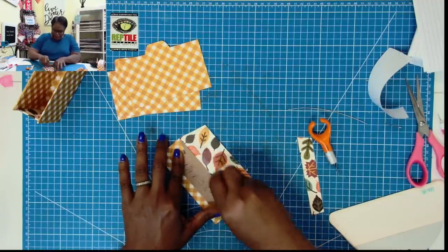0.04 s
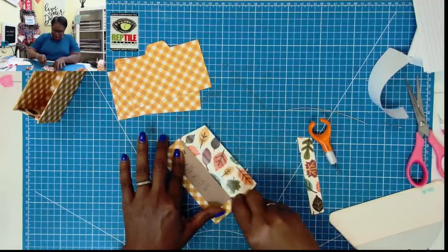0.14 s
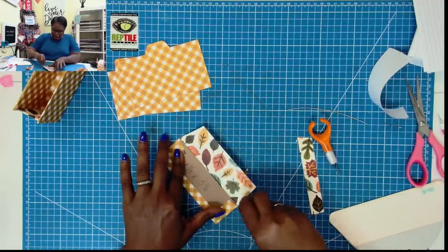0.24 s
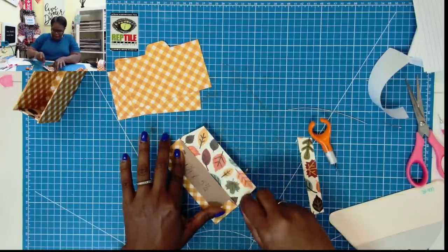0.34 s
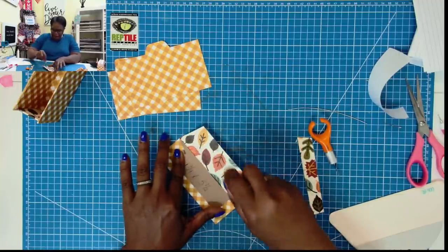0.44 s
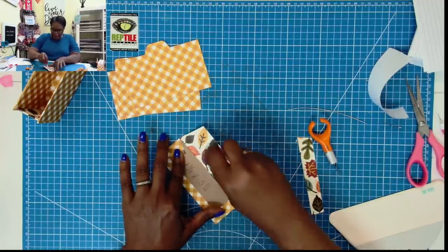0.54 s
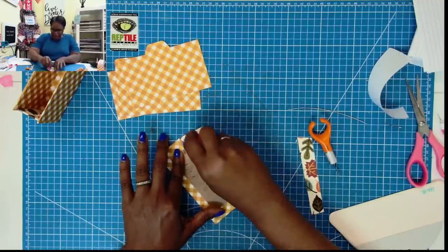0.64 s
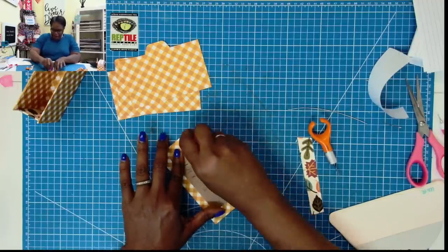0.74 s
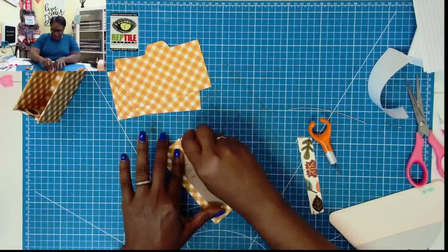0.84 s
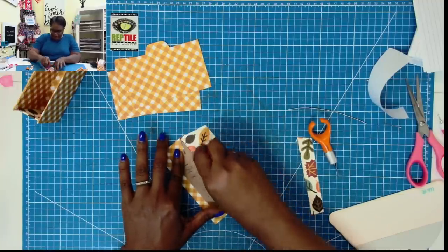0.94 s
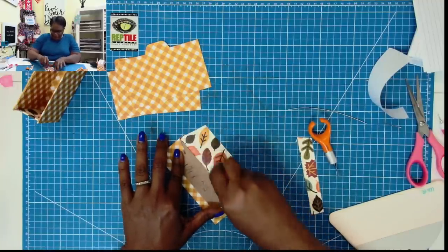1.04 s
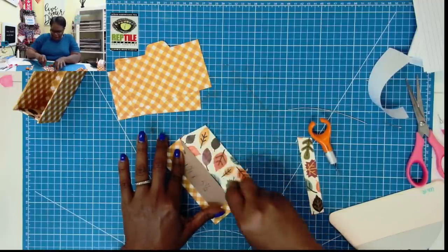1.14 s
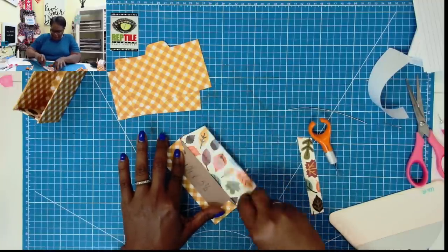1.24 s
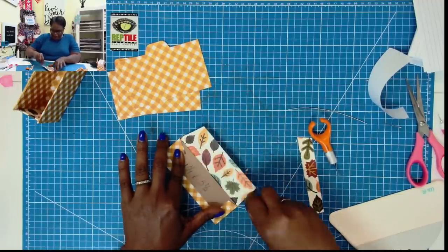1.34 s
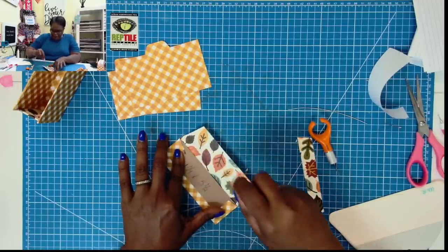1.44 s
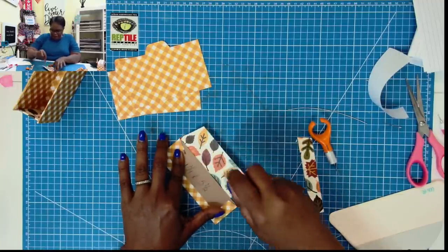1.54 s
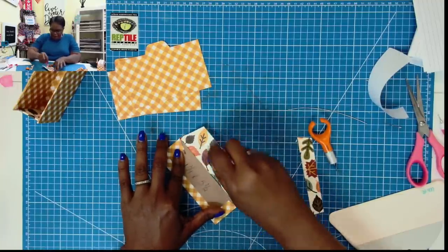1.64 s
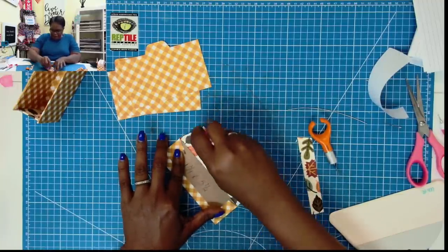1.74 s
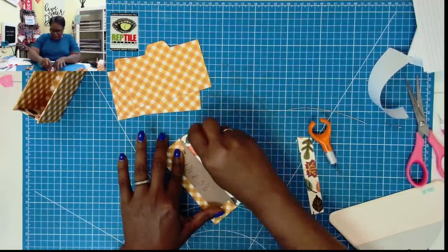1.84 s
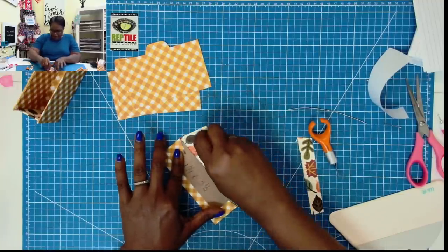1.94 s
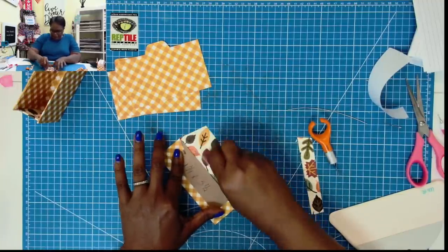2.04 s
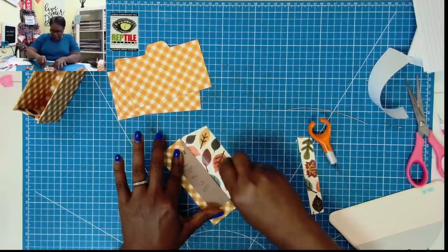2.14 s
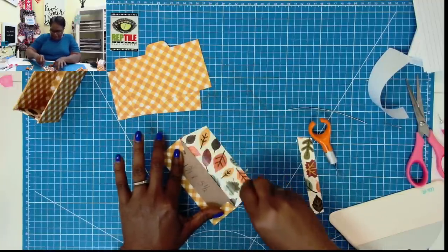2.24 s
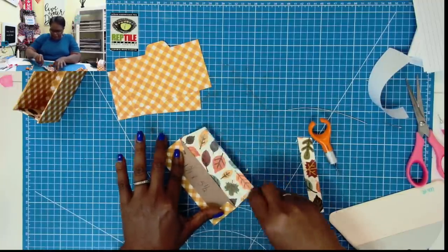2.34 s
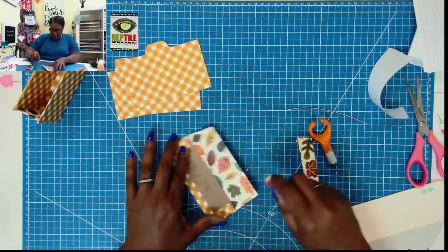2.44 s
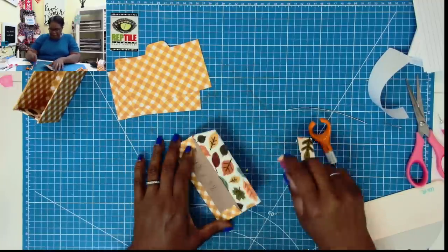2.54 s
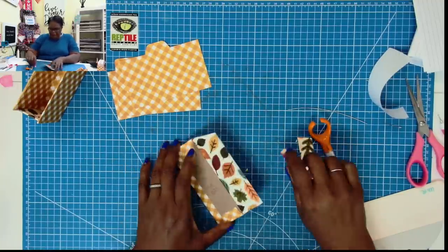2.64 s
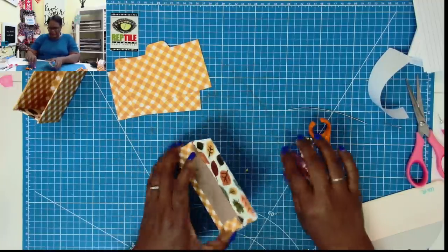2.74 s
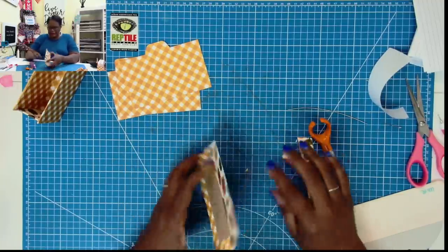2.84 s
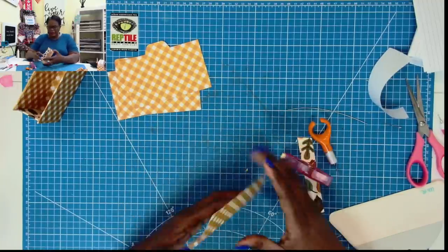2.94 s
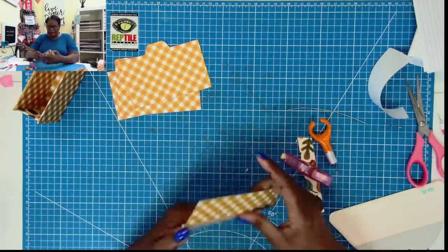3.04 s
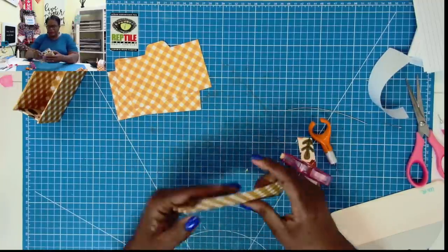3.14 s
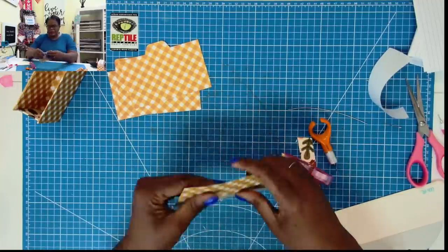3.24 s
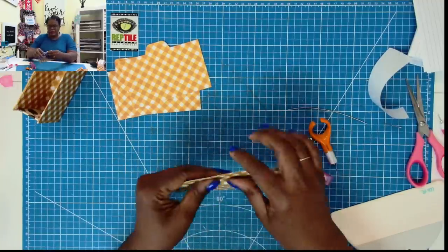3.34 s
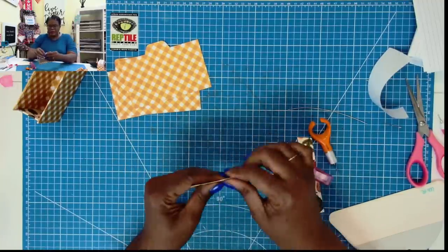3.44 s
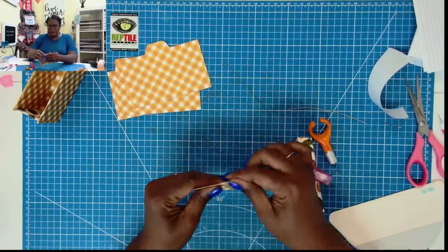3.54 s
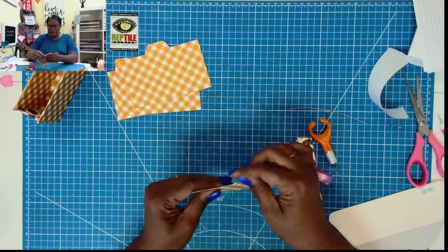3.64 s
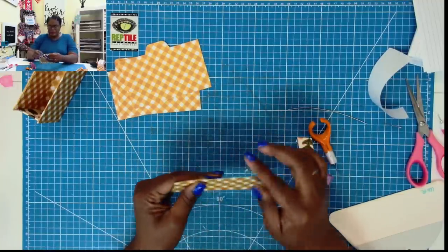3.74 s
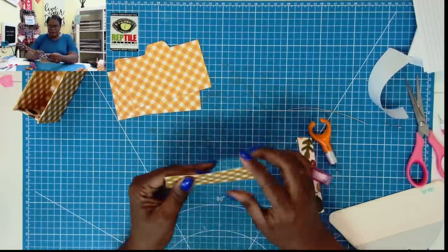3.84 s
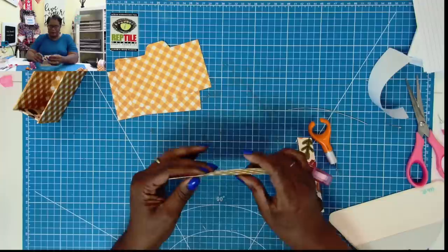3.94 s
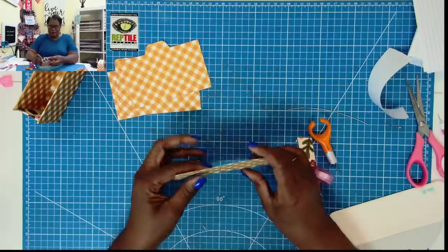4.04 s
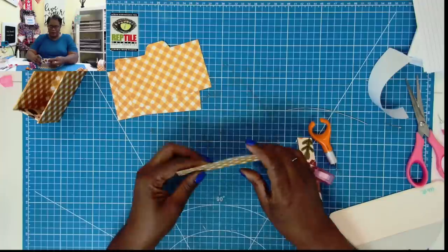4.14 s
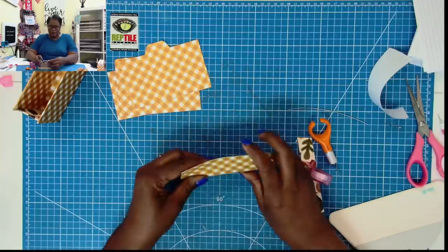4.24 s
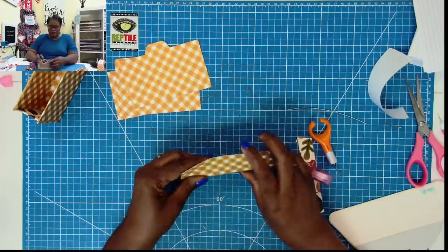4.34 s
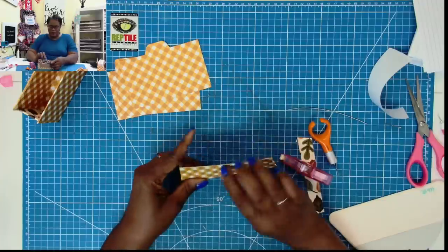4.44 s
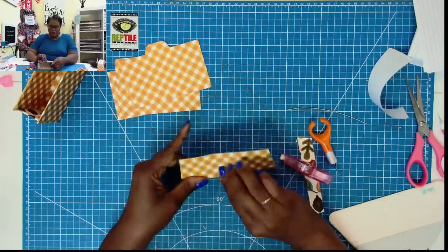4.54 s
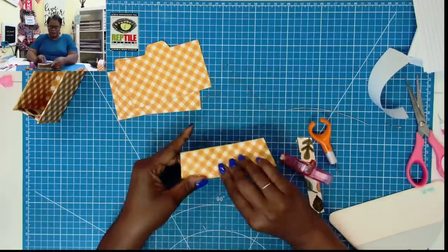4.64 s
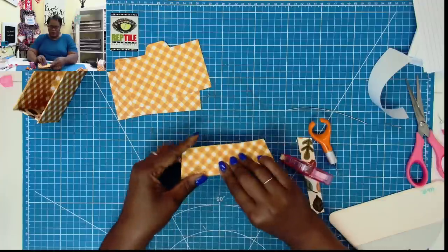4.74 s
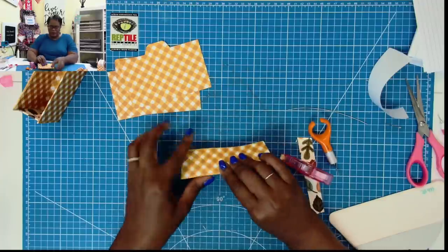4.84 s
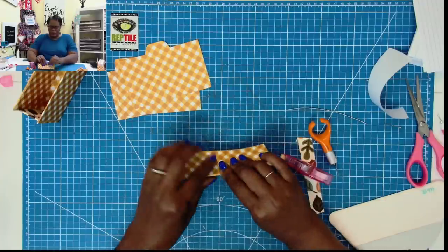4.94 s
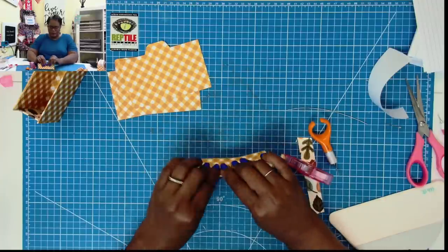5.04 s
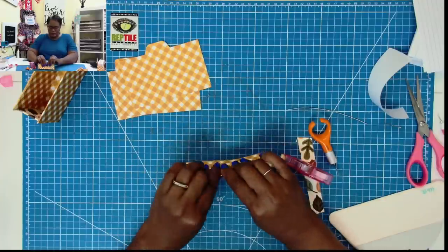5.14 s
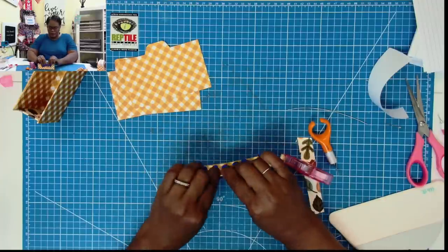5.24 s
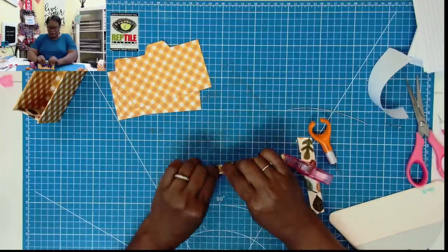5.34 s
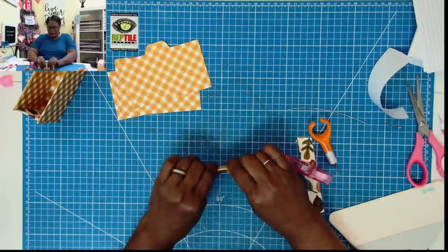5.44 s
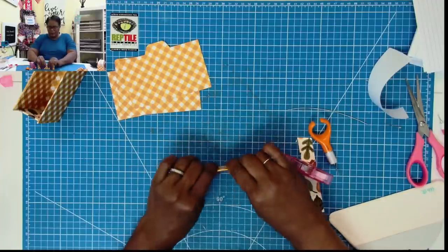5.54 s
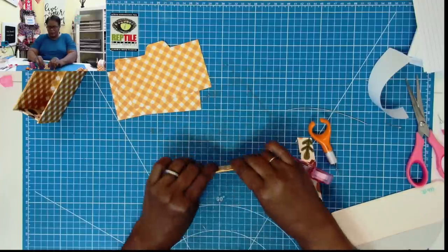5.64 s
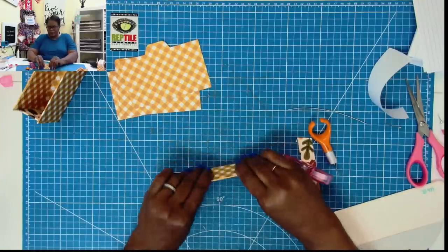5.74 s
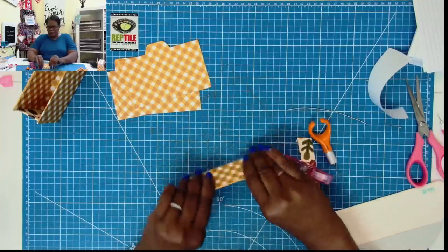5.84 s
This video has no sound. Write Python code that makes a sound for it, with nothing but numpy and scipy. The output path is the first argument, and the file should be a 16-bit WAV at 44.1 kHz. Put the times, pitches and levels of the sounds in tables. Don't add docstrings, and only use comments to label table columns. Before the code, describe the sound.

Close up in a small furnished room, a plastic tape runner makes three dry, ratcheting strokes over card, with little squeaks and sharp snaps at the edge. The tool drops with a ringing knock. Fingers then turn and fold stiff card with ticks, crinkles and pops, ending in soft kneading thumps. Low ventilation rumble, nearly mono microphone.

```python
import sys
import numpy as np
from scipy import signal
from scipy.fft import rfft, irfft, next_fast_len
from scipy.io import wavfile
from scipy.ndimage import uniform_filter1d, map_coordinates

SR = 44100
rng = np.random.default_rng(int(sys.argv[2]) if len(sys.argv) > 2 else 0)


def pcm_store(signal):
    levels = np.round(np.clip(np.atleast_2d(signal), -1, 1) * 32767)
    wavfile.write(sys.argv[1], SR, levels.astype(np.int16).T)


def natural_amplitude(level_db):
    exponent = np.asarray(level_db, float) / 20
    return 10 ** exponent


N = 259293

# time_s, drag_db, bite_db
STROKE_LEVELS = [
    [(0.0, -38, 4), (0.0735, -37, 0.5), (0.076, -22, -3), (0.09, -56, 4), (0.13, -69, 16)],
    [(0.67, -90, 16), (0.695, -42, -2), (0.75, -37, 0.5), (0.818, -38, -2), (0.834, -41.5, -4),
     (0.946, -31, -1), (1.034, -39.5, -28), (1.102, -36.5, -16), (1.16, -54, -1)],
    [(1.73, -86, 4), (1.75, -40.5, -3), (1.816, -36, 0.5), (1.86, -35.5, -1.5), (1.944, -41.5, -10),
     (1.994, -34, 2.5), (2.147, -41, -6.5), (2.151, -34.5, 7.5), (2.22, -64, -9)],
]
# time_s, teeth_hz, depth_db
RATCHET_TEETH = [
    [(0.0, 200, 2), (0.075, 200, 1)],
    [(0.6936, 98, 11), (0.72, 148, 10), (0.755, 235, 5), (0.79, 250, 2.5), (0.86, 370, 1.5),
     (0.93, 310, 1.5), (0.97, 290, 5), (1.01, 230, 2.5), (1.1, 200, .6)],
    [(1.7636, 140, 6), (1.795, 215, 5), (1.86, 242, 7), (1.89, 230, 2.5), (1.95, 280, .6), (2.02, 290, 3.5),
     (2.05, 275, 6), (2.09, 290, 2.5), (2.15, 250, 1.2)],
]
# pitch_hz, width_hz, level_db
CASE_MODES = [(1420, 320, -4.5), (2500, 640, -2), (3300, 860, -2.5), (3950, 700, -2.5)]
# pitch_hz, level_db_per_hz
FIBRE_HISS = [(240, -39), (400, -16), (625, -8.5), (877, -11.5), (1460, -6.5), (2110, -15.5), (2460, -2),
              (2780, -7), (3900, -2), (5900, -8.5), (8540, -1), (10800, -11.5), (15800, -10)]
# pitch_hz, level_db_per_hz
AIR_SPECTRUM = [(8.8, -37), (15, 0.5), (36, -4), (77, -22.5), (91, -33), (126, -13.5), (150, -23),
                (310, -25), (348, -18), (380, -24), (680, -30.5), (1050, -28.5), (1290, -34), (1890, -34),
                (15800, -41)]
# pitch_hz, width_hz, level_db
VENT_HUM = [(24.3, 8.1, -54), (70.5, 3.4, -57.5), (117.8, 7.5, -61.5)]
# pitch_hz, t60_s
ROOM_DECAY = [(150, 0.41), (1000, 0.2), (4000, 0.18), (12000, 0.13)]
# start_s, strength_db, sharpness_db (crack over ring), ring_hz
TIP_CATCHES = [(0.0064, -38, 21.5, 2440), (0.0825, -37, 1, 2700), (0.5355, -50.5, 4.5, 1660),
               (0.669, -44.5, -12, 1380), (0.6768, -54, 10, 2500), (0.6934, -32, 0, 2450),
               (0.7896, -45, 27, 2500), (0.9472, -52, 18, 3090), (0.9752, -42.5, 23, 3390),
               (1.1118, -31, 9, 3570), (1.7526, -34.5, 9, 1280), (1.9206, -43.5, 17, 2390),
               (1.9857, -42.5, 27, 1620), (2.0853, -38, 19.5, 3300), (2.1737, -29, 0, 3300)]
# start_s, strength_db, sharpness_db, ring_hz
LANDINGS = [
    (0.595, -43.5, -2, 1270),
    (1.618, -55, 1, 1440),
    (1.6769, -41, -4, 1190),
    (2.8404, -44.5, 8, 1200),
]
# start_s, strength_db, sharpness_db, ring_hz
EDGE_SNAPS = [
    (0.0741, -32, 24.3, 3360),
    (1.1026, -32, 25.4, 1130),
    (2.1483, -34, 26.6, 3430),
]
# pitch_hz, width_hz, level_db
EDGE_MODES = [(3430, 2100, -3.5), (4740, 2170, 0), (7300, 1300, 1), (9130, 1400, 0.5), (13100, 1560, -7)]
# pitch_hz, width_hz, level_db
CARD_MODES = [(840, 52, -9.5), (1145, 360, -7), (1636, 180, -5), (1455, 190, -10.5), (2630, 480, -8),
              (3060, 290, -8.5)]
# pitch_hz, width_hz, level_db
TABLE_MODES = [(289, 125, -0.5), (411, 97, 4), (480, 89, 2.5), (592, 82, -1), (706, 104, -5.5)]
# pitch_hz, width_hz, level_db
LEG_MODES = [(72, 4.6, 0), (113.2, 14, 3), (184, 154, -2), (245, 164, -2)]
# start_s, peak_db
PUSHES = [(0.597, -26.5), (0.984, -39.5), (1.674, -22), (2.151, -38.5), (2.189, -35.5), (2.541, -18),
          (3.864, -43), (5.036, -35.5), (5.179, -25), (5.21, -31), (5.235, -29), (5.253, -29), (5.294, -29),
          (5.332, -31), (5.423, -37), (5.459, -28), (5.498, -28.5), (5.547, -31), (5.6, -31.5),
          (5.651, -42)]
# middle_s, length_s, pitch_hz, level_db
ROLLER_SQUEAKS = [(0.736, 0.028, 5450, -39), (0.756, 0.025, 7300, -33), (0.76, .07, 1445, -40),
                  (0.765, 0.057, 2505, -37), (.812, 0.023, 2486, -26.5), (.815, 0.022, 4910, -40),
                  (0.913, 0.071, 1623, -34.5), (.925, 0.051, 3430, -36.5), (0.947, 0.049, 3156, -35.5),
                  (0.988, 0.016, 312, -40), (1.86, 0.042, 7300, -37), (1.883, 0.048, 1462, -36.5),
                  (1.881, 0.036, 3950, -34), (2.003, 0.074, 1560, -36.5), (2.018, 0.0495, 3950, -36),
                  (2.028, 0.05, 3300, -34), (2.079, 0.054, 4000, -35), (2.16, 0.017, 3400, -27),
                  (1.8, 0.073, 1502, -40), (1.817, .04, 3950, -38)]
# time_s, level_db
GRIP_LEVEL = [
    (2.22, -58.5),
    (2.96, -58.5),
    (3.52, -56),
    (3.79, -58),
    (3.92, -50),
    (4.06, -51.5),
    (4.52, -56),
    (4.68, -74),
    (4.93, -63.5),
    (5.88, -63),
]
# flex_db, crinkle_db, rub_db
GRIP_LAYERS_DB = [-11, -9, -8.5]
# middle_s, half_length_s, level_db, touch (0 bends, 1 crinkles, 2 brushes)
SLIDES = [(2.301, 0.015, -57, 1.4), (2.368, 0.018, -51, 0.78), (2.585, 0.035, -42.5, 0.18),
          (2.916, 0.046, -52.5, 1.8), (3.096, 0.022, -58, 1.7), (3.164, 0.047, -43.5, 1.1),
          (3.357, 0.012, -67, 0.24), (3.412, 0.13, -60.5, 2.1), (3.476, 0.031, -52, 2.2),
          (3.513, 0.036, -51, 1.44), (3.906, 0.026, -71, 3.1), (4.004, 0.04, -58, 1.8),
          (4.235, 0.039, -52.5, 0.37), (4.348, 0.01, -53.5, 1.7), (4.558, 0.04, -55, 1.35),
          (4.648, 0.031, -41.5, 1.57), (4.869, .023, -59, 1.35), (4.926, 0.019, -61, 2.1),
          (5.14, 0.1, -56, 0.039), (5.171, 0.027, -49, 2.27), (5.29, 0.037, -50, 1.24),
          (5.38, 0.055, -53.5, 0.47), (5.452, 0.024, -55, 2), (5.49, 0.061, -54.5, 2.4),
          (5.538, 0.027, -49.5, 0.077), (5.624, 0.042, -59, 1.7), (5.667, 0.034, -59.5, 0.084)]
# start_s, length_s, level_db, touch
SCRAPES = [
    (2.656, .024, -54.5, 1.1),
    (2.833, 0.046, -46.5, .25),
    (4.339, 0.019, -54, 0.94),
    (5.139, 0.17, -62.5, 0.63),
    (5.25, .051, -51, 2.5),
    (5.416, 0.21, -56, 0.55),
    (5.642, 0.047, -59, 2.6),
    (5.713, 0.04, -44.5, 2.7),
    (5.819, .071, -50.5, 0.76),
]
# middle_s, half_length_s, level_db
CREASES = [
    (3.137, 0.012, -34),
    (3.765, 0.022, -37.5),
    (3.864, 0.022, -33.5),
    (3.99, 0.0041, -24),
    (4.203, 0.026, -29.5),
    (4.306, 0.004, -35),
    (4.602, 0.015, -31.5),
    (4.628, 0.011, -46),
    (4.632, 0.0055, -34),
]
# flex_db, crinkle_db, rub_db
CREASE_LAYERS_DB = [-8, -5.5, -9.5]
# pitch_hz, width_hz, level_db
CRINKLE_MODES = [(700, 670, -6), (1200, 690, 1), (1900, 720, 0.5), (2700, 960, -2.5)]
# pitch_hz, width_hz, level_db
RUB_MODES = [(3300, 1800, -6), (5060, 1300, -2.5), (7300, 2200, -0.5), (9130, 1600, -0.5),
             (13100, 3000, -7)]
# start_s, strength_db, sharpness_db, ring_hz
NAIL_TAPS = [(2.2953, -68, 29, 1190), (2.3566, -35, -4, 1460), (2.4369, -47, 1.5, 2460),
             (2.663, -61, 17, 1100), (2.6884, -34, 3.5, 1540), (2.9124, -38, 12.5, 2600),
             (2.9625, -47.5, 7, 2400), (3.076, -49, 4, 2280), (3.0931, -41, -11, 2350),
             (3.1316, -46, 23, 3030), (3.1356, -24.5, -12, 2500), (3.1495, -32, -6, 1900),
             (3.1605, -36, -6, 1980), (3.1687, -27.5, -0.5, 1710), (3.1825, -34.5, -12, 1620),
             (3.2555, -49, 5, 2500), (3.286, -47, 2, 2080), (3.3245, -52, -21, 2420),
             (3.3374, -42.5, -30, 2330), (3.445, -40, -8, 2630), (3.4567, -34, 6, 2620),
             (3.4774, -31.5, -4, 2610), (3.5964, -51, 8, 3270), (3.7017, -52, -3, 2130),
             (3.7222, -62, 18, 1680)]
# start_s, strength_db, sharpness_db, ring_hz
FOLD_POPS = [(3.7544, -33, -7, 2160), (3.7598, -33.5, 5.5, 940), (3.9474, -44.5, 7, 2730),
             (3.9605, -48, 3, 2900), (4.1979, -18, 4.5, 2800), (4.2425, -32, -15, 910),
             (4.3027, -37, -5, 1620), (4.3094, -27.5, -23, 1610), (4.3388, -34.5, 4, 2900),
             (4.418, -34, -3.5, 1240), (4.4766, -29.5, 2.5, 2360), (4.5417, -42.5, 3.5, 2330),
             (4.8263, -55, -1, 1640), (4.8443, -38.5, -6, 2360), (4.922, -47.5, -5, 2610),
             (5.7497, -58, 28.5, 2340)]
# start_s, strength_db, sharpness_db, ring_hz
BUCKLE_POPS = [(4.5824, -43, 9, 1160), (4.5981, -23, -3, 2100), (4.6018, -24.5, 6.5, 2620),
               (4.6084, -15, -22, 1680), (4.6205, -27, -14, 2200), (4.63, -17, -12, 2170),
               (4.6328, -16, -4, 1630), (4.6445, -28, -12, 2300), (4.6485, -31.5, -17, 1320),
               (4.6515, -31, -15, 1490), (4.66, -34, -12, 1900), (4.6645, -35, -12, 2300)]
# start_s, strength_db, sharpness_db
KNEADS = [(5.034, -46, 6.5), (5.12, -54, -10), (5.144, -39, -8), (5.1633, -42, -15), (5.1812, -36, -4),
          (5.2103, -35, -3), (5.237, -35.5, -4), (5.257, -27.5, -3), (5.2869, -35.5, -12),
          (5.2964, -27, -1), (5.33, -42.5, -22), (5.42, -45, -6), (5.4444, -35, -8), (5.46, -39.5, -11),
          (5.471, -41.5, -2), (5.485, -45, -12), (5.504, -50, -12), (5.5208, -46, 3), (5.534, -47, -12),
          (5.55, -45, -12), (5.5757, -41.5, -3.5), (5.599, -45, 6.5), (5.633, -49, -5), (5.647, -56, -8),
          (5.8235, -42.5, -14)]
# middle_s, length_s, pitch_hz, level_db
FINGER_SKIMS = [
    (2.377, .025, 1474, -46),
    (2.874, .037, 4660, -43),
    (2.875, .035, 2530, -45.5),
    (3.41, .08, 2630, -47.5),
    (3.89, .04, 7300, -46),
    (5.85, .05, 1200, -42),
]
# start_s, strength_db, sharpness_db, ring_hz
BLOWS = [
    (2.5408, -12.5, 2, 1160),
    (2.5798, -28, 0, 1040),
    (3.8645, -17, 3, 840),
    (3.9911, -21, 6.5, 1250),
]
# pitch_hz, level_db, t60_s
BARREL_MODES = [(365, -4, .09), (578, -3, 0.17), (840, -2, 0.18), (899, -1, 0.2), (1070, -0.5, .13),
                (1255, 0.5, 0.084), (1390, -17, 0.14), (1610, -14, 0.064), (2060, -13, 0.052),
                (2450, -1.5, 0.037)]
# start_s, level_db
FALLS = [
    (2.5417, -25),
    (2.5545, -41),
    (2.5809, -43),
    (2.598, -45),
]

TIP_TOP_HZ, CARD_TOP_HZ = 12000, 8500
TOUCH_LOSS_DB = 11


def unit(x):
    return x / np.sqrt(np.mean(x ** 2) + 1e-20)


def along(points, hz):
    f, v = np.transpose(points)
    return np.interp(np.log(hz + 1), np.log(f + 1), v)


def curves(rows):
    s, *columns = np.transpose(rows)
    t = np.arange(N) / SR
    return natural_amplitude([np.interp(t, s, db, -150, -150) for db in columns])


def wobble(rate_hz):
    knots = rng.standard_normal(int(N * rate_hz / SR) + 4)
    return map_coordinates(knots, [np.arange(N) * rate_hz / SR])


def filtered(x, response):
    n = x.shape[-1]
    m = next_fast_len(n + 4096)
    return irfft(rfft(x, m) * response(np.fft.rfftfreq(m, 1 / SR)), m)[..., :n]


def modes(table):
    def response(f):
        total = 0
        for k, (hz, width_hz, db) in enumerate(table):
            damping = 1j * f * width_hz
            total = total + (-1) ** k * natural_amplitude(db) * damping / (hz * hz - f * f + damping)
        return total
    return response


def soft(table, top_hz):
    return lambda f: modes(table)(f) / (1 + 1j * f / top_hz) ** 2


def grit(per_second, size_db, patchy_db):
    z = signal.stft(rng.standard_normal(N), nperseg=256)[2]
    field = uniform_filter1d(rng.standard_normal(z.shape), size=5, axis=0)
    field = uniform_filter1d(field, size=9, axis=1)
    noise = signal.istft(z * natural_amplitude(patchy_db * unit(field)), nperseg=256)[1][:N]
    chance, size = rng.random(N), rng.standard_normal(N)
    ticks = (chance < per_second / SR) * natural_amplitude(size_db) * size
    return unit(unit(noise) + ticks)


def ratchet():
    swing, t = np.zeros(N), np.arange(N) / SR
    for rows in RATCHET_TEETH:
        s, rate_hz, depth_db = np.transpose(rows)
        teeth = np.cumsum(np.interp(t, s, rate_hz, 0, 0)) / SR
        swing += np.interp(t, s, depth_db, 0, 0) * (1 - 2 * (teeth % 1))
    return uniform_filter1d(swing, size=24)


def runner():
    hiss, bite = sum(curves(rows) for rows in STROKE_LEVELS)
    flutter_db = wobble(44.9) + ratchet()
    case = unit(filtered(grit(600, size_db=16, patchy_db=3), soft(CASE_MODES, top_hz=7800)))
    fibres = grit(800, size_db=10, patchy_db=2.5)
    fibres = unit(filtered(fibres, lambda f: natural_amplitude(along(FIBRE_HISS, f))))
    drag = unit(filtered(rng.standard_normal(N), soft(LEG_MODES[2:], top_hz=402)))
    rasp = hiss * bite * natural_amplitude(flutter_db - 5) * case
    rustle = natural_amplitude(flutter_db + 1.2 * wobble(120) - 1.5) * fibres
    return rasp + hiss * (rustle + natural_amplitude(-26.5) * drag)


def room_tone(level_db=-53, apart_db=-19):
    mid, side = filtered(rng.standard_normal((2, N)), lambda f: natural_amplitude(along(AIR_SPECTRUM, f)))
    hum = np.zeros(N)
    for hz, width_hz, db in VENT_HUM:
        hum += natural_amplitude(db) * unit(filtered(rng.standard_normal(N), modes([(hz, width_hz, 0)])))
    scale = natural_amplitude(level_db) / np.std(mid)
    return scale * mid + hum + scale * natural_amplitude(apart_db) * side * np.array([[1], [-1]])


def room(x, apart_db=-20):
    hz, t, z = signal.stft(rng.standard_normal((2, SR // 3)), SR, nperseg=128)
    decay = natural_amplitude(-60 * t / along(ROOM_DECAY, hz)[:, None])
    mid, side = signal.istft(z * decay, SR, nperseg=128)[1]
    side = natural_amplitude(apart_db) * side
    tail = np.array([mid + side, mid - side]) / np.linalg.norm(mid)
    delayed = np.pad(x, (130, 0))[None]
    return signal.fftconvolve(delayed, tail, axes=1)[:, :N]


def contacts(rows, weight_db, per_octave_db=0.0, bright_hz=9020):
    events = []
    for s, db, sharp_db, ring_hz in rows:
        thud_db = db + weight_db + per_octave_db * np.log2(ring_hz / 1500)
        crack_hz = bright_hz if sharp_db > 6 else 3830
        events.append((s, db + sharp_db, db, thud_db, ring_hz, crack_hz))
    return events


def knocks(events, crack_t60, ring_t60, thud_t60, scatter, top_hz, slip_size=0.6, fold_db=0):
    slips, slip_s = 3, 0.0016
    out, t = np.zeros(N + SR), np.arange(SR // 7) / SR
    t60 = np.array([[crack_t60], [ring_t60], [thud_t60]])
    for s, crack_db, ring_db, thud_db, ring_hz, crack_hz in events:
        rattle = scatter * rng.standard_normal((3, len(t))) * natural_amplitude(-60 * t / t60)
        rattle[:, 0] += 1
        when, size = rng.random(slips), rng.uniform(-1.35, 1, slips)
        rattle[:2, 1 + (when * slip_s * SR).astype(int)] += slip_size * size
        span = [(ring_hz, 0.3 * ring_hz, 4)]
        fold = [(crack_hz, 0.025 * crack_hz, fold_db)]
        edge = soft(fold + EDGE_MODES, top_hz)
        card = soft(span + CARD_MODES, top_hz=4000)
        table = soft(TABLE_MODES, top_hz=840)
        levels_db = (crack_db + 2.5, ring_db + 4.5, thud_db + 6.5)
        for push, body, db in zip(rattle, (edge, card, table), levels_db):
            sound = filtered(push, body)
            out[round((s + 0.0007) * SR):][:len(t)] += natural_amplitude(db) * sound / np.abs(sound).max()
    return out[:N]


def tip_clicks():
    events = contacts(TIP_CATCHES, weight_db=-13) + contacts(LANDINGS, weight_db=1.5)
    return knocks(events, crack_t60=0.012, ring_t60=0.012, thud_t60=0.03, scatter=0.2, top_hz=TIP_TOP_HZ)


def edge_snaps():
    events = contacts(EDGE_SNAPS, weight_db=-15.5, bright_hz=4980)
    return knocks(events, crack_t60=0.01, ring_t60=0.012, thud_t60=0.03, scatter=0.04,
                  top_hz=TIP_TOP_HZ, slip_size=0.35, fold_db=-9)


def thumps():
    pushes = np.zeros(N)
    for s, db in PUSHES:
        pushes[round(s * SR)] = natural_amplitude(db + 43.5)
    return filtered(pushes, soft(LEG_MODES, top_hz=490))


def squeaks(rows, wander_hz, steady, swing_db=0):
    out, t = np.zeros(N), np.arange(N) / SR
    drift, beat = wobble(300), wobble(500)
    for s, length_s, hz, db in rows:
        part = slice(round((s - length_s) * SR), round((s + length_s) * SR))
        phase = 2 * np.pi * np.cumsum(hz + wander_hz * drift[part]) / SR
        swell = np.exp(-(2.4 * (t[part] - s) / length_s) ** 2)
        out[part] += natural_amplitude(db) * (steady + 0.74 * beat[part]) * swell * np.sin(phase)
    return out * natural_amplitude(swing_db)


def roller_squeaks():
    return squeaks(ROLLER_SQUEAKS, wander_hz=100, steady=1.2, swing_db=0.45 * ratchet() - 2)


def hands():
    t, layer = np.arange(N) / SR, np.arange(3)
    break_s, fade_s = 0.005, 0.022

    def swell(s, half_s, layers_db):
        return natural_amplitude(np.c_[layers_db]) * np.exp(-2 * ((t - s) / half_s) ** 2)

    def touched(db, touch):
        return db - TOUCH_LOSS_DB * (layer - touch) ** 2

    gains = curves(GRIP_LEVEL) * natural_amplitude(np.c_[GRIP_LAYERS_DB])
    for s, half_s, db, touch in SLIDES:
        gains = gains + swell(s, half_s, touched(db, touch))
    for s, length_s, db, touch in SCRAPES:
        held = np.interp(t, [s, s + break_s, s + length_s, s + length_s + fade_s], [0, 1, 1, 0])
        gains = gains + held * natural_amplitude(np.c_[touched(db, touch)])
    for s, half_s, db in CREASES:
        gains = gains + swell(s, half_s, db + np.array(CREASE_LAYERS_DB))
    flex, crinkle, rub = gains
    clump = wobble(70)
    low = grit(450, size_db=15.5, patchy_db=1.5)
    low = unit(filtered(low, soft(LEG_MODES[2:] + TABLE_MODES, top_hz=1200)))
    middle = unit(filtered(grit(700, size_db=18, patchy_db=2), soft(CRINKLE_MODES, top_hz=5200)))
    high = unit(filtered(grit(500, size_db=11, patchy_db=2.5), modes(RUB_MODES)))
    return natural_amplitude(2 * clump) * (flex * low + crinkle * middle) + rub * natural_amplitude(1.2 * clump) * high


def card_pops():
    events = contacts(NAIL_TAPS, weight_db=-16, per_octave_db=6)
    events += contacts(FOLD_POPS, weight_db=-17, per_octave_db=1)
    events += contacts(BUCKLE_POPS, weight_db=-30)
    knead_hz = 1130
    events += contacts([(*row, knead_hz) for row in KNEADS], weight_db=-5)
    return knocks(events, crack_t60=0.014, ring_t60=0.03, thud_t60=0.04, scatter=0.15, top_hz=CARD_TOP_HZ)


def finger_skims():
    return squeaks(FINGER_SKIMS, wander_hz=330, steady=0.2)


def heavy_blows():
    events = contacts(BLOWS, weight_db=-7)
    return knocks(events, crack_t60=0.03, ring_t60=0.1, thud_t60=0.08, scatter=0.04, top_hz=CARD_TOP_HZ)


def fall():
    out, t = np.zeros(N), np.arange(SR // 4) / SR
    beat_hz = 28
    for s, db in FALLS:
        luck = rng.standard_normal((len(BARREL_MODES), 2))
        ring = np.zeros(len(t))
        for (hz, level_db, t60), (a, b) in zip(BARREL_MODES, luck):
            twin = 0.94 * np.sin(2 * np.pi * (hz + beat_hz * b) * t)
            ring += natural_amplitude(level_db + 1.5 * a - 60 * t / t60) * (np.sin(2 * np.pi * hz * t) + twin)
        out[round(s * SR):][:len(t)] += natural_amplitude(db - 4) * ring
    return out


def scene():
    strokes = runner() + tip_clicks() + edge_snaps() + roller_squeaks()
    card = hands() + card_pops() + finger_skims()
    table = thumps() + heavy_blows() + fall()
    near = strokes + card + table
    return near + natural_amplitude(-11) * room(near) + room_tone()


def band_limit(x):
    return signal.sosfilt(signal.butter(12, 16810, fs=SR, output="sos"), x)


def record(dry):
    top_hz, lean_db = 15850, -1.5
    ports = filtered(dry, lambda f: natural_amplitude(-38 * (f > top_hz)))
    ports = ports * natural_amplitude([[lean_db / 2], [-lean_db / 2]])
    return band_limit(ports)


dry = scene()
out = record(dry)
pcm_store(out)
```